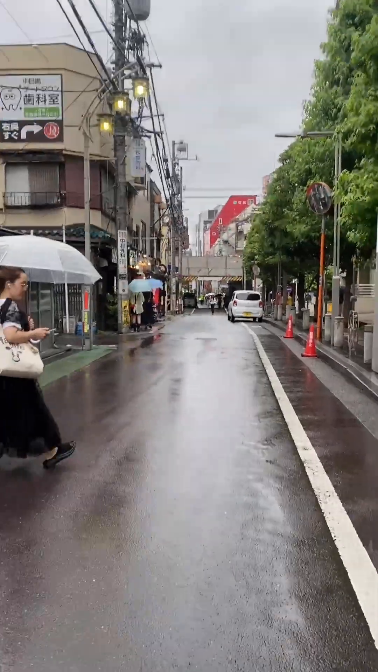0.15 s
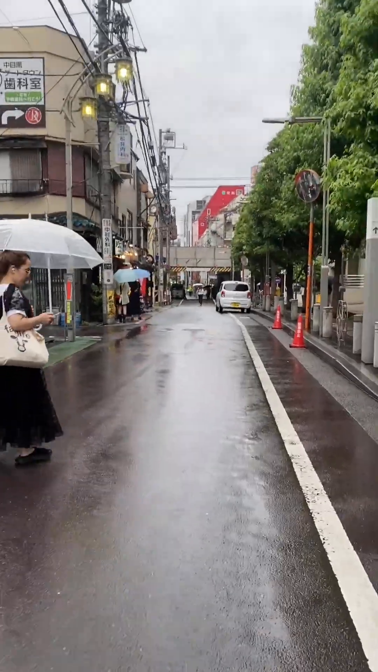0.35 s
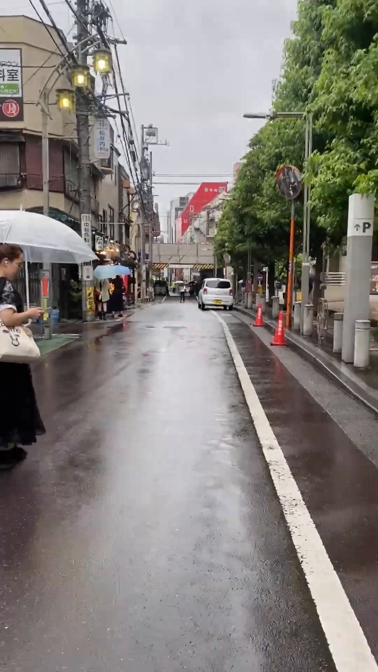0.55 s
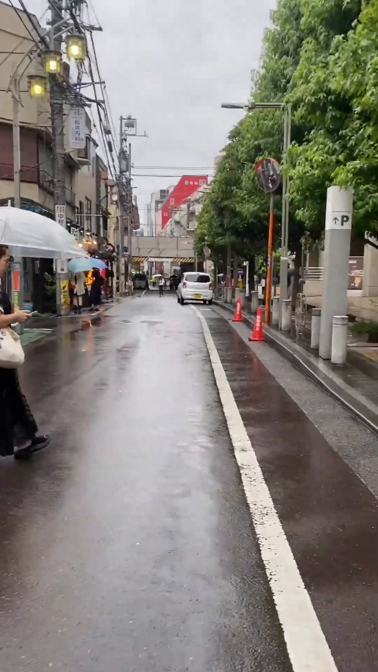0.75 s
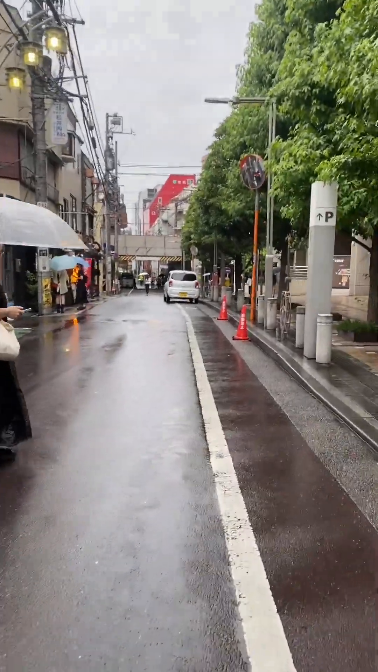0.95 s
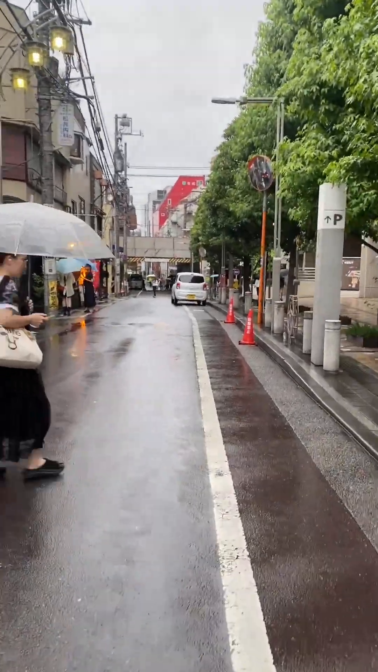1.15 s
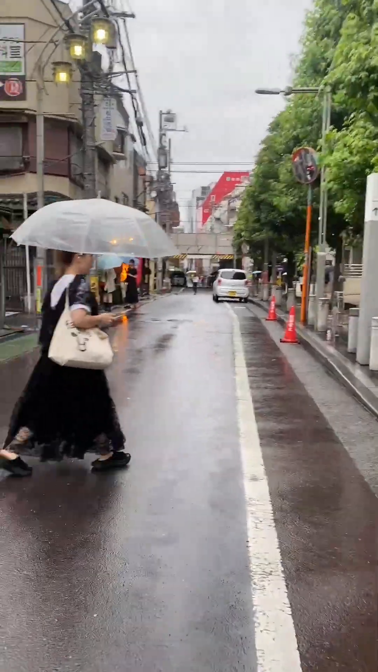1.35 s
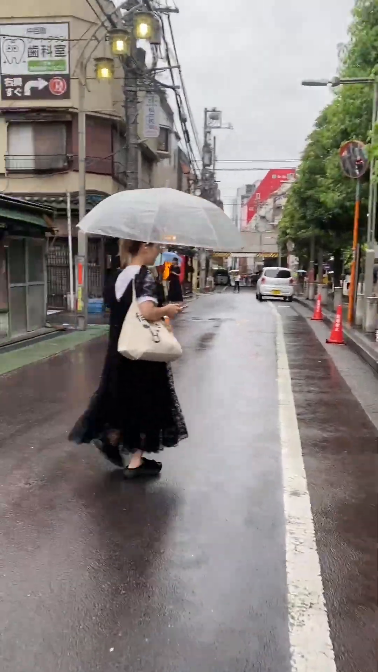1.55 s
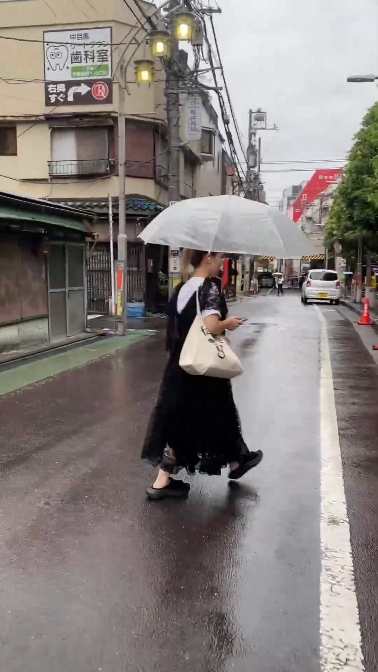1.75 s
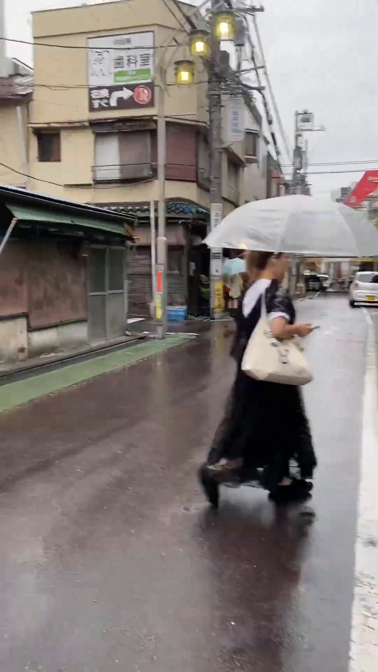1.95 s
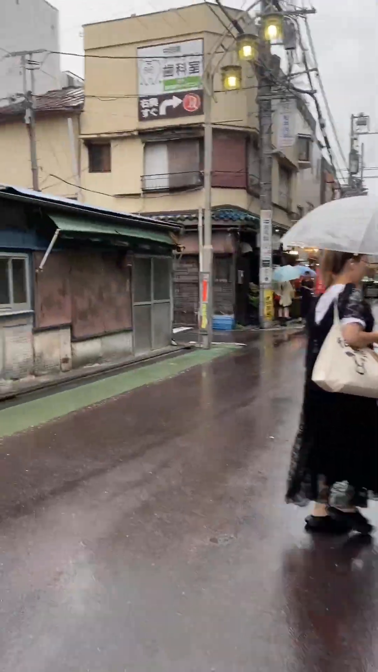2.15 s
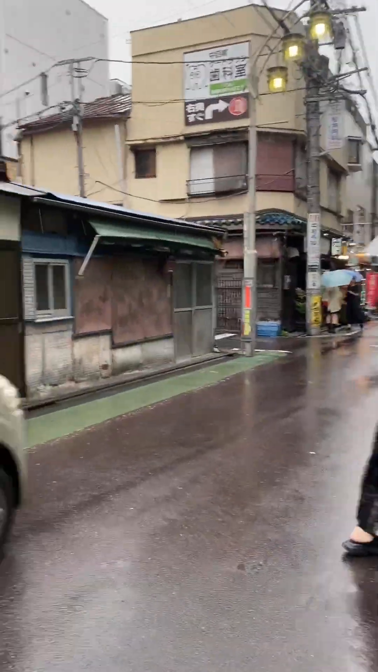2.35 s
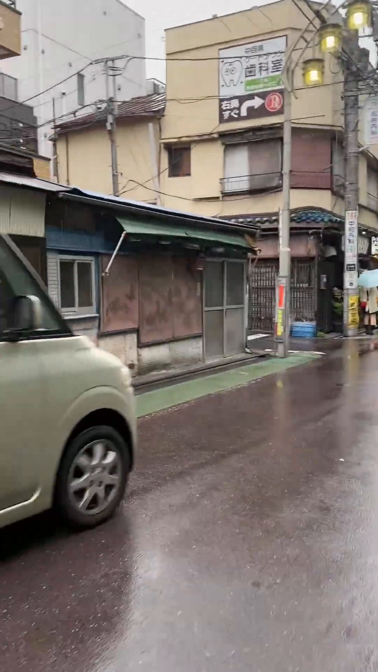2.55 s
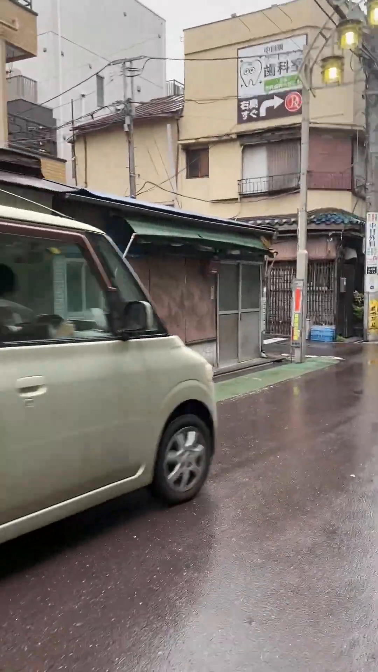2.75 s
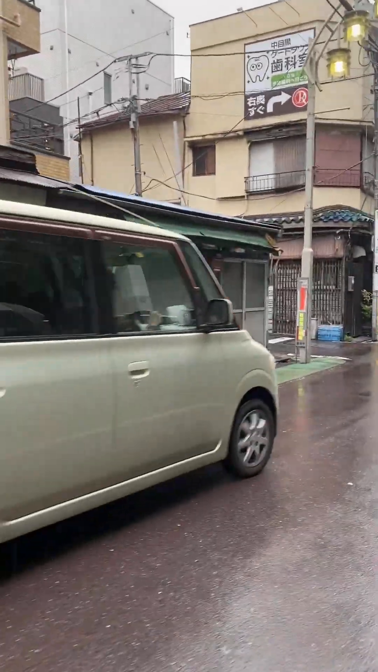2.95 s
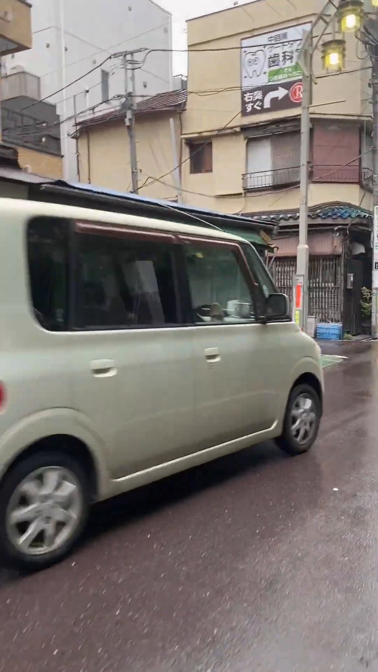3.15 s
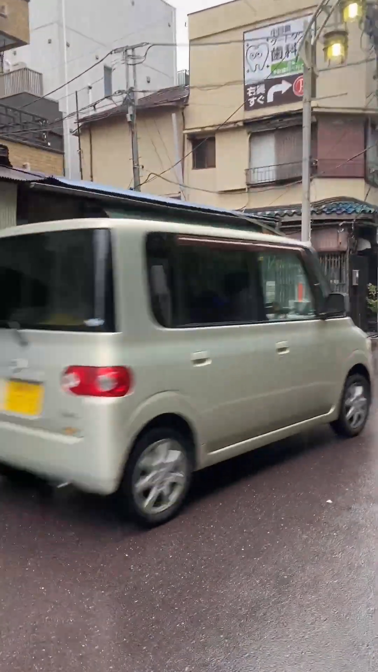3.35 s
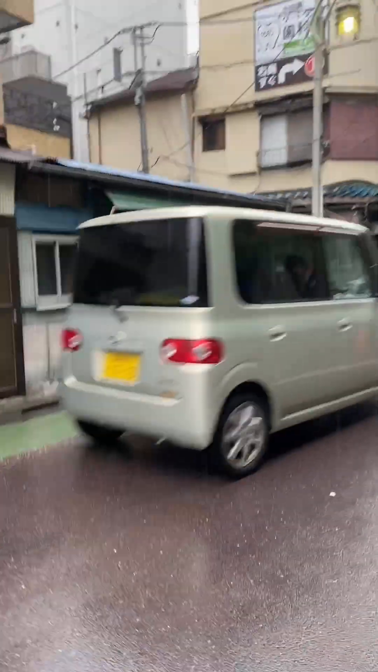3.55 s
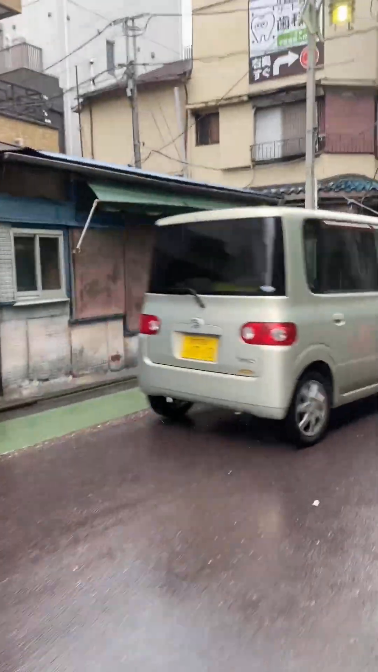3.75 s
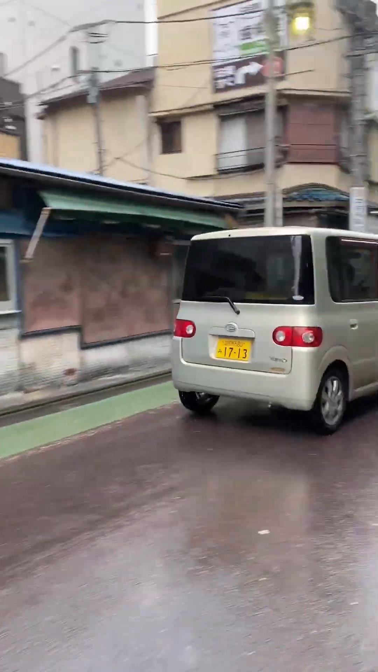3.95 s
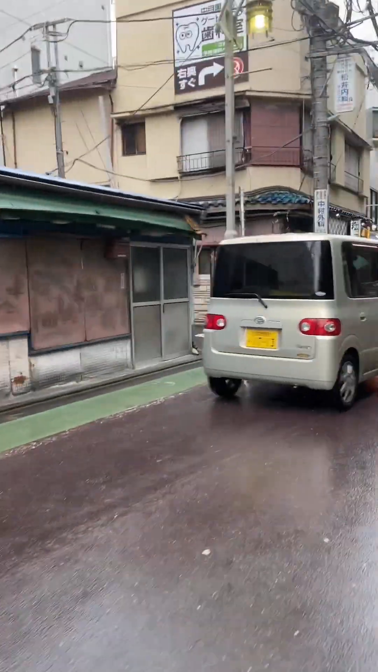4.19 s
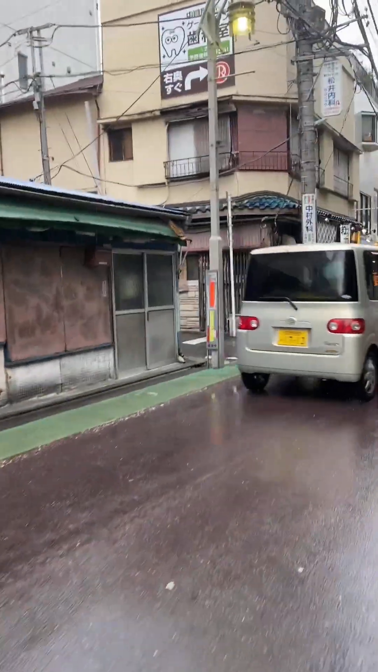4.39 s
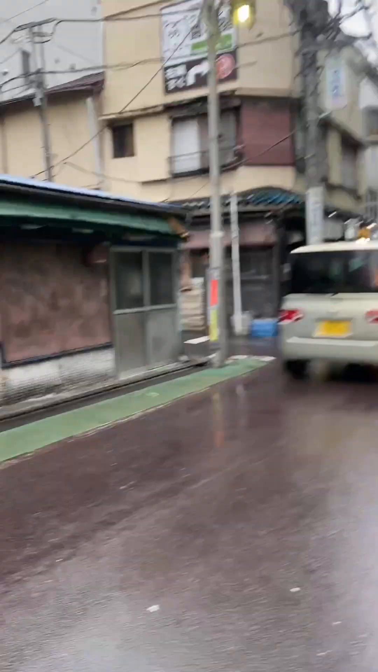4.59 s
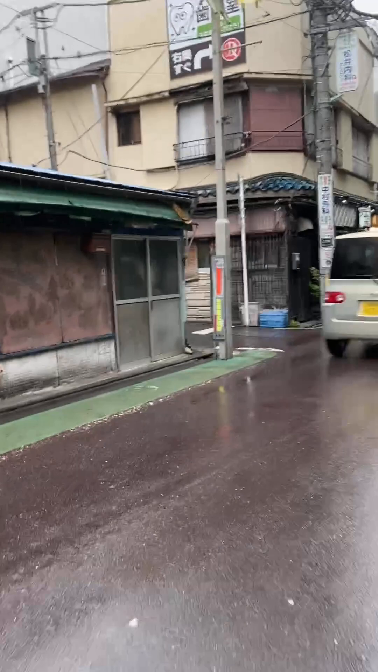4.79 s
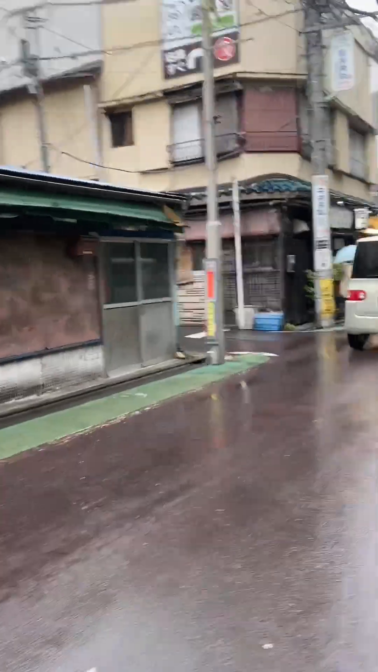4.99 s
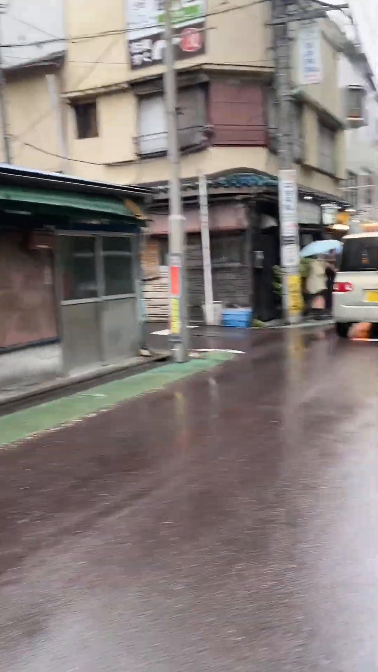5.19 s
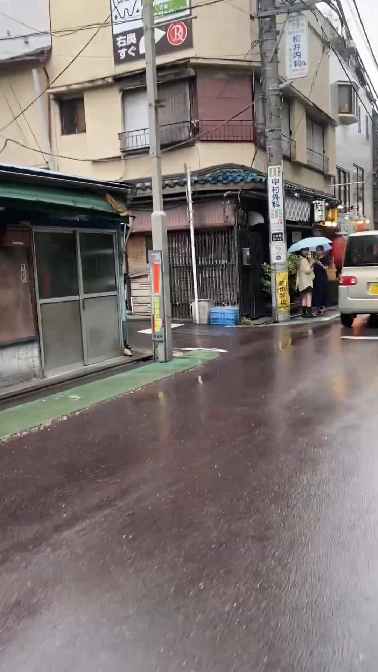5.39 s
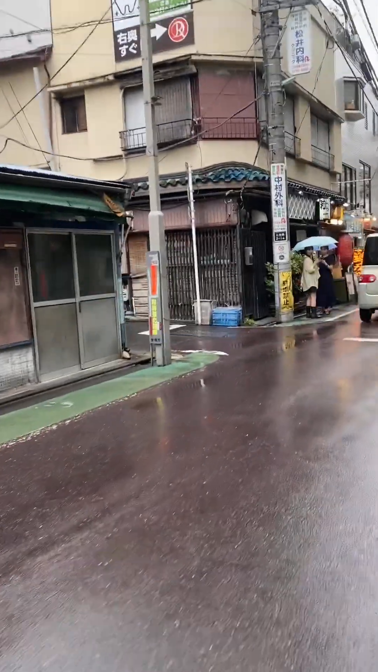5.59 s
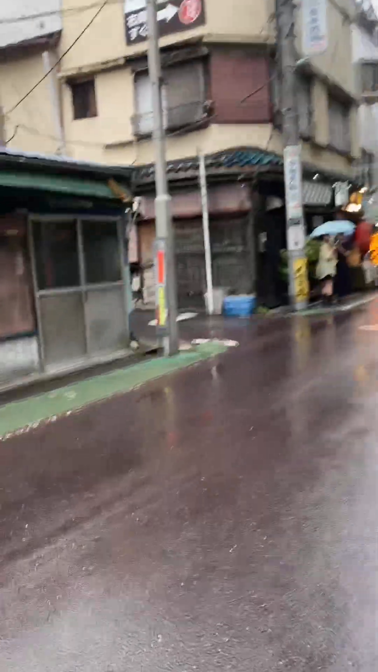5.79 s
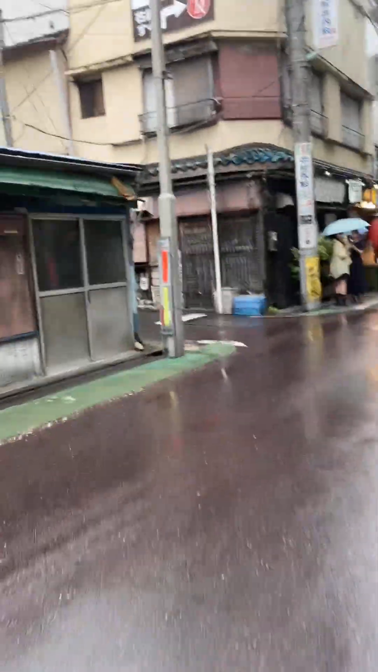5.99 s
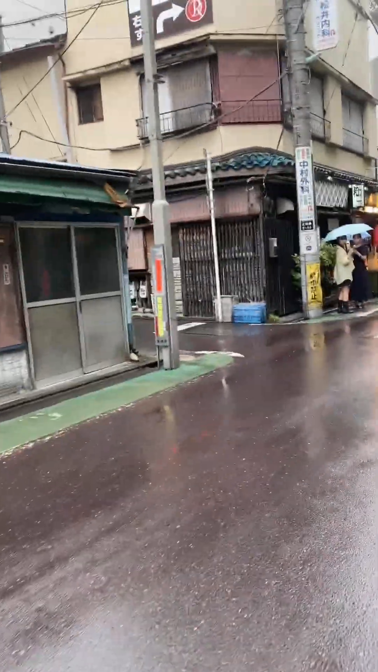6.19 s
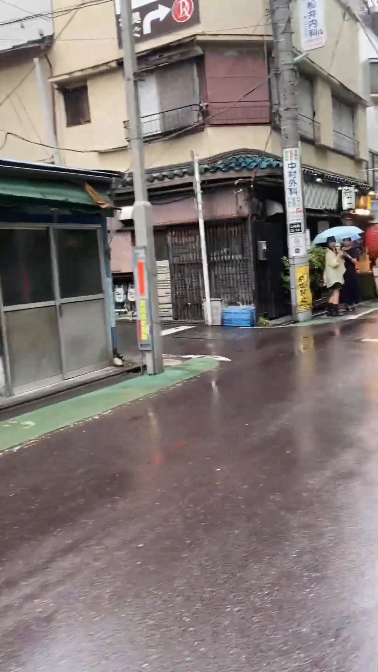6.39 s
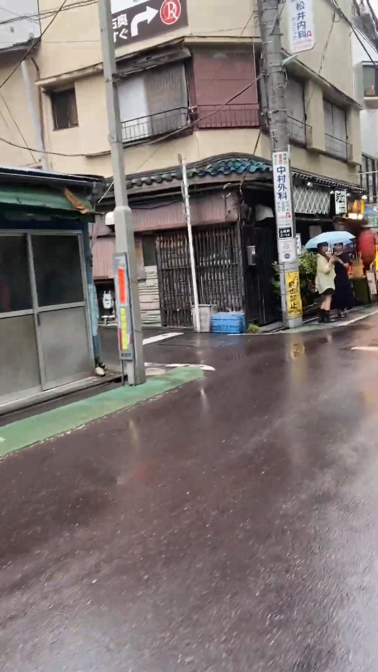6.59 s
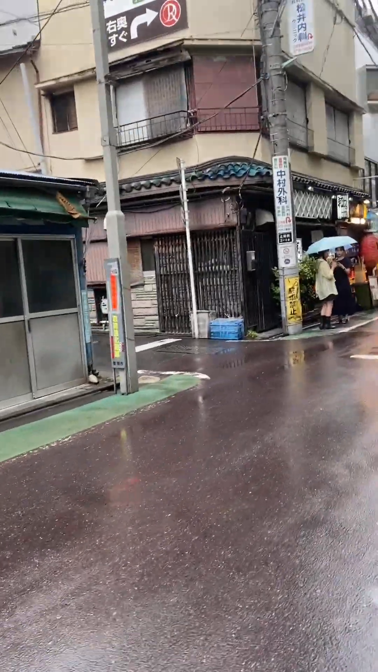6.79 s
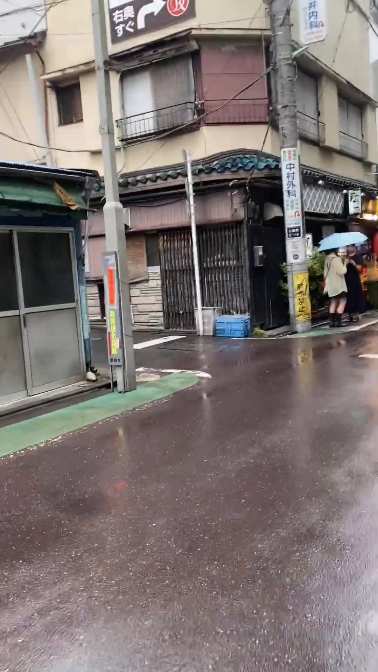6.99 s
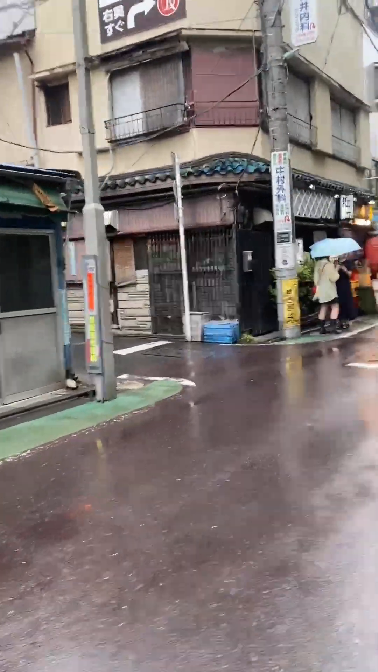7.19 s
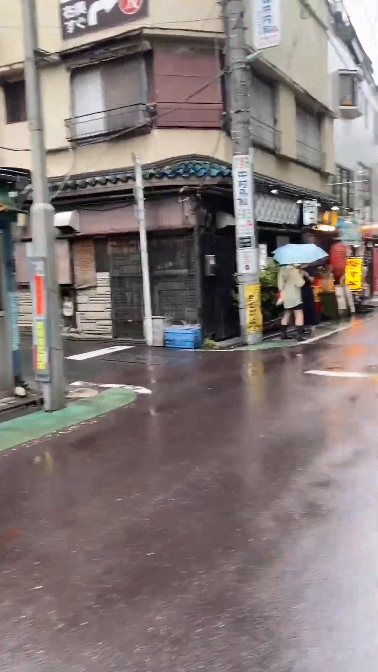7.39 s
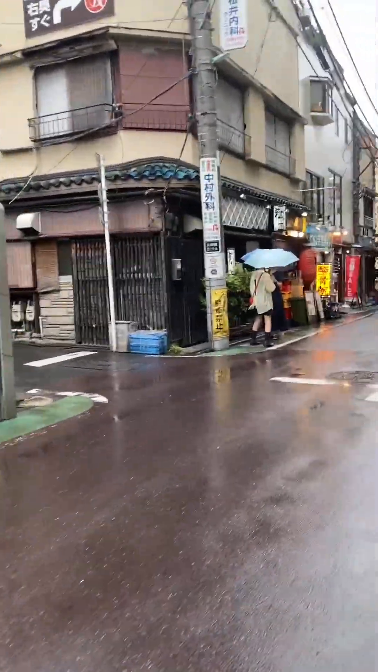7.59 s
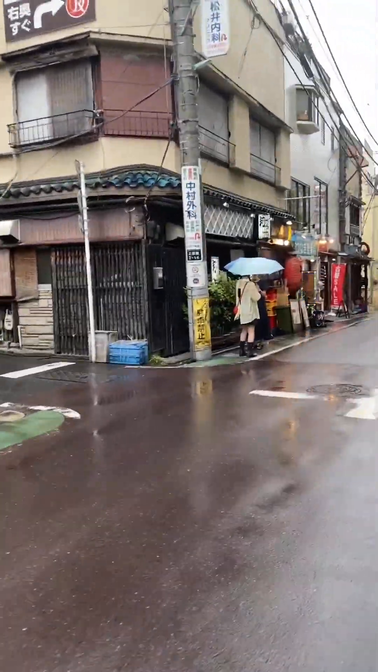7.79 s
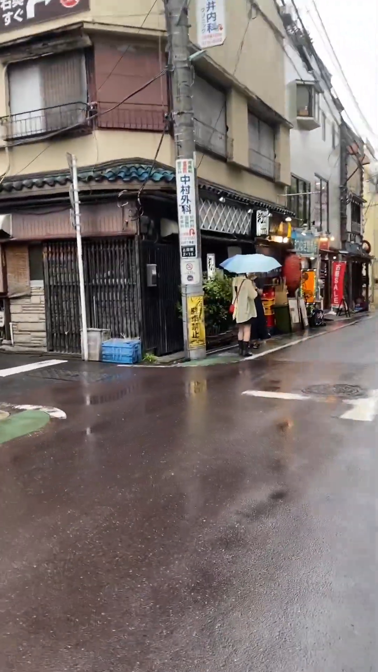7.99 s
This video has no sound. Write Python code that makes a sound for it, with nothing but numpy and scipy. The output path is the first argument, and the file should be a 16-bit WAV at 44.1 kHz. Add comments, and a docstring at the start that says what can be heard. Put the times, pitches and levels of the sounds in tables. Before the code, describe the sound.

A small car picks up from idle and drives past close by on a wet street, engine booming and tyres hissing, then recedes into low rumble.

```python
"""A small car pulls away from idle on a wet street, drives past close by and eases off as it recedes.
Its exhaust booms at the firing rate (sums of sine waves), its tyres hiss and flick water (shaped noise
and random drops); distant traffic, a few wet footsteps and a light knock share the street.
Two closely spaced microphone ports hear it, and their difference widens the picture."""
import sys
import numpy as np
from scipy import signal
from scipy.fft import rfft, irfft, next_fast_len
from scipy.io import wavfile
from scipy.ndimage import map_coordinates

SR = 44100
rng = np.random.default_rng(int(sys.argv[2]) if len(sys.argv) > 2 else 0)


def wrap_up_sound(samples):
    """Save the sound to the file named by the first command line argument, as 16-bit audio."""
    columns = np.atleast_2d(samples).T
    # keep every value between -1 and 1, then stretch to whole-number steps
    tamed = np.clip(columns, -1, 1)
    steps = np.round(tamed * 32767).astype(np.int16)
    wavfile.write(sys.argv[1], SR, steps)


N = 354563
TIME = np.arange(N) / SR  # seconds
SIZE = next_fast_len(N + SR // 4)  # transform length, with room for late echoes
BIN_HZ = np.maximum(np.arange(SIZE // 2 + 1) * SR / SIZE, 1)

# port difference against port sum for sound from the front of the car:
# (frequency [Hz], level [dB], phase lag [rad], coherent share [0-1])
PORTS_AHEAD = [(60, -33, 1.7, 1), (150, -14, 1.8, 0.96), (300, -6, 2.0, 0.94), (550, 5, 1.6, 0.89),
               (1000, 10.5, 2.9, 0.67), (1400, 7.5, 2.2, 0.6), (1750, 1.5, 2.2, 0.7),
               (2200, 8.5, 1.4, 0.68), (2800, 2.5, 3.0, 0.34), (4000, -1, 4.9, 0.64),
               (5000, 4.5, 4.7, 0.79), (7030, 9, 4.8, 0.77)]


def from_db(db):
    """Turn decibels into a gain."""
    return np.exp(np.asarray(db) * np.log(10) / 20)


def rms_one(x):
    """Scale to unit power."""
    return x / np.sqrt(np.mean(x ** 2) + 1e-20)


def in_time(rows):
    """Read each column of a time curve at every sample."""
    s, *columns = np.transpose(rows)
    return [np.interp(TIME, s, c) for c in columns]


def over_hz(rows):
    """Read each column of a spectrum at every frequency bin, on a logarithmic pitch scale."""
    hz, *columns = np.transpose(rows)
    return [np.interp(np.log(BIN_HZ), np.log(hz), c) for c in columns]


def drift(rate):
    """Smooth random wander of spread 1, changing about rate times a second."""
    knots = rng.standard_normal(2048)
    coarse_time = TIME[::32]
    wander = map_coordinates(knots, [coarse_time * rate * 2], order=3, mode="wrap")
    return np.interp(TIME, coarse_time, rms_one(wander))


def swell(at_s, half_s, steepness):
    """Gain of something going by: 1 at at_s, one half at half_s before and after."""
    return 1 / (1 + np.abs((TIME - at_s) / half_s) ** steepness)


def nearness(at_s, pass_s):
    """Closest distance over present distance on a straight pass."""
    return 1 / np.sqrt(1 + ((TIME - at_s) / pass_s) ** 2)


def coloured(x, spectrum):
    """Give x a spectrum that falls away steeply beyond its ends; rms 1."""
    low_hz, high_hz = spectrum[0][0], spectrum[-1][0]
    skirts = 1 / (1 + (low_hz / BIN_HZ) ** 6) / (1 + (BIN_HZ / high_hz) ** 6)
    gain = from_db(over_hz(spectrum)[0]) * skirts
    return rms_one(irfft(rfft(x, SIZE) * gain, SIZE)[:N])


def droplets(per_s, spread_db):
    """Snaps of single droplets of uneven size, at random moments; rms 1."""
    sizes = from_db(spread_db * np.minimum(rng.exponential(1, N), 4)) * rng.choice([-1, 1], N)
    lands = rng.random(N) < per_s / SR
    return rms_one(sizes * lands)


def wet_noise(per_s, spread_db, drops_db):
    """Smooth hiss plus droplets; drops_db sets the droplets against the hiss."""
    return from_db(drops_db) * droplets(per_s, spread_db) + rng.standard_normal(N)


def patchy(x, patchy_db, rate):
    """Uneven water on the road: each third of an octave flutters by itself, about rate times a second."""
    hz, s, cells = signal.stft(x, SR, nperseg=512)
    third_octaves = 3 * np.log2(1 + hz / 300)
    place = np.meshgrid(third_octaves, s * rate * 2, indexing="ij")
    flutter = map_coordinates(rng.standard_normal((24, 600)), place, order=1, mode="mirror")
    return signal.istft(cells * from_db(patchy_db * rms_one(flutter)), SR)[1][:N]


def ports(x, direction, scatter_per_s=16):
    """Left and right are x plus and minus the port difference, partly scattered along ever-changing paths."""
    scatter_rad = 2.5  # how far the scattered phase wanders
    side_db, lag, share = over_hz(direction)
    difference = rfft(x, SIZE) * from_db(side_db)
    direct = irfft(difference * share * np.exp(-1j * lag), SIZE)[:N]
    # each narrow band gets its own delay of up to 25 ms
    echo_s = np.interp(BIN_HZ, np.linspace(0, SR / 2, 1500), rng.uniform(0, .025, 1500))
    phase = 2 * np.pi * np.cumsum(echo_s) * SR / SIZE
    paths = np.sqrt(1 - share ** 2) * np.exp(-1j * phase)
    # a half spectrum gives a complex signal, whose phase can then wander
    scattered = 2 * np.fft.ifft(difference * paths, SIZE)[:N]
    scattered = scattered * np.exp(1j * scatter_rad * drift(scatter_per_s))
    side = direct + scattered.real
    return np.array([x + side, x - side])


def straight(x, direction):
    """Short sharp sounds reach the two ports by the direct path alone."""
    side_db, lag, _ = over_hz(direction)
    side = irfft(rfft(x, SIZE) * from_db(side_db) * np.exp(-1j * lag), SIZE)[:N]
    return np.array([x + side, x - side])


def engine():
    """Clean low exhaust harmonics glide through the pipe's resonances; the engine's other voices join them."""
    # engine speed: idle, pulling away, easing off: (time [s], firing rate [Hz])
    firing = [(0,27.1),(1.25,26.7),(1.57,36.3),(1.8,42.8),(1.95,46.4),(2.1,48.6),(2.4,51.2),(2.7,54.0),(3.2,55.1),(4.05,56.5),(4.35,56),(4.5,53.3),(4.65,48.4),(4.88,40.6),(5.1,35.3),(5.8,34.5),(6.6,34),(7.5,34.2),(8.04,35)]
    # strength of the exhaust pulses, following the throttle: (time [s], level [dB])
    effort = [(0,-38.5),(.7,-40),(.92,-33.5),(1.05,-37.5),(1.25,-34),(1.41,-22),(2.6,-20.5),(4.35,-23.5),(4.6,-30.5),(4.69,-39.5),(5.06,-46),(5.15,-31),(5.66,-30.5),(5.9,-34.5),(6.22,-36.5),(6.37,-49.5),(6.48,-38),(7.38,-35.5),(7.58,-50.5),(7.7,-36.5),(8.04,-37.5)]
    # resonances of the exhaust pipe and silencer: (frequency [Hz], level [dB])
    pipe = [(34,-30),(40,-15.5),(47,-1.5),(54,-0.5),(68,1.9),(80,-6),(96,0),(102,-2.5),(105.5,-8.5),(109,-8.5),(114,-4.5),(128,-15),(146,-3),(168,-6)]
    third_cut_db = -11.5  # lowers the third harmonic against the second
    boom_db, boom_at_s, boom_pass_s = 5, 2.94, 0.85  # the fundamental swells as the tailpipe comes close

    firing_hz, effort_db = in_time(firing)[0], in_time(effort)[0]
    turn = 2 * np.pi * np.cumsum(firing_hz * (1 + 0.0021 * drift(10.0))) / SR
    pipe_db = np.interp(np.outer([1, 2, 3], firing_hz), *np.transpose(pipe))
    first_db, second_db, third_db = effort_db + pipe_db

    first_gain = from_db(first_db + boom_db + 0.21 * drift(5.1)) * nearness(boom_at_s, boom_pass_s)
    boom = first_gain * np.cos(turn)
    boom += from_db(second_db + .4 * drift(6)) * np.cos(2 * turn - np.pi / 4)
    boom += from_db(third_db + third_cut_db + 1.2 * drift(6)) * np.sin(3 * turn)

    tones = np.sqrt(2) * (boom + whine() + hum() + drone(firing_hz, turn))  # root 2: levels become rms
    noises = mutter(turn) + intake(turn) + burble() + far_roar()
    return ports(tones + noises, PORTS_AHEAD, scatter_per_s=1.5)


def whine():
    """A faint rough whine: one wobbling tone grows, climbs as the car gathers speed and dies away."""
    # path of the whine: (time [s], pitch [Hz], level [dB])
    whine_path = [(0,515,-69),(.8,525,-60),(1.15,545,-55.5),(1.45,529.5,-57),(1.65,589,-71),(1.88,617,-53),(2.1,618,-70.5),(2.5,623,-100)]
    roughness = .05  # spread of the pitch, as a fraction
    hz, db = in_time(whine_path)
    turn = 2 * np.pi * np.cumsum(hz * (1 + roughness * drift(45))) / SR
    return np.cos(turn) * from_db(db + 3 * drift(14))


def hum():
    """Two engine-bay tones an octave apart rise a little and settle; close by, the low one beats with the exhaust."""
    settled_hz, rise_hz, rise_end_s = 205.3, 10, 3.2  # the rise takes one second
    high_db, far_db, high_at_s, high_half_s = -41, -57, 3.6, 1.2  # swells as the car goes by
    low_db, low_at_s, low_half_s = -33.5, 2.8, 0.74  # the lower octave carries only a short way

    hz = settled_hz - rise_hz * np.clip(rise_end_s - TIME, 0, 1)
    turn = 2 * np.pi * np.cumsum(hz) / SR
    gain = from_db(high_db) * swell(high_at_s, high_half_s, steepness=15) + from_db(far_db)
    high = np.cos(turn + .6 * drift(5)) * gain * from_db(2 * drift(5))
    low = np.cos(turn / 2) * from_db(low_db) * swell(low_at_s, low_half_s, steepness=1.5)
    return high + low


def mutter(turn):
    """Uneven idle firings puff in the low middle range, as pulsing noise, until the engine picks up."""
    # colour of the idle mutter: (frequency [Hz], level [dB per Hz])
    mutter_colour = [(105,-2.5),(135,0.5),(165,0),(195,-9.5)]
    level_db, at_s, half_s = -47, 1, 0.78
    puffs = rms_one(np.exp(0.7 * np.cos(turn)))
    gain = from_db(level_db) * swell(at_s, half_s, steepness=4.7)
    return coloured(rng.standard_normal(N), mutter_colour) * puffs * gain


def street():
    """Distant traffic on wet asphalt is fluttering wet noise, with the footsteps and the knock in it."""
    # colour of the distant traffic: (frequency [Hz], level [dB per Hz])
    traffic_colour = [(36,-15),(55,-3.5),(78,-2),(105,-6.5),(150,-11.5),(205,-11.5),(280,-16.5),(430,-23.5),(640,-33),(850,-39),(1100,-37.5),(1380,-39.5),(1850,-37.5),(2300,-43.5),(2900,-45),(4000,-52),(4900,-61),(6000,-59.5),(8000,-73)]
    # strength of the distant traffic: (time [s], level [dB])
    traffic_level = [(0,-38),(1.1,-37),(5.5,-37.5),(6.15,-38),(6.8,-37),(7.45,-37),(8.04,-37.5)]
    # port difference against port sum for sound from the street:
    # (frequency [Hz], level [dB], phase lag [rad], coherent share [0-1])
    street_ports = [(60, -33, 1.9, 0.65), (150, -12.5, 2.0, 0.69), (300, -6.5, 2.1, 0.76),
                    (550, 5.5, 1.4, 0.77), (1000, 14, 2.8, 0.5), (1500, 6, 4.4, 0.54),
                    (2100, 4.5, 3.0, 0.43), (2800, 5, 4.9, 0.71), (3800, 3.5, 4.5, 0.57),
                    (5000, 7.5, 4.6, 0.66), (7000, 4.5, 4.7, 0.78)]
    wet_road = coloured(wet_noise(per_s=200, spread_db=3.0, drops_db=-12.5), traffic_colour)
    traffic = from_db(in_time(traffic_level)[0]) * patchy(wet_road, patchy_db=2.24, rate=10)
    return ports(traffic, street_ports) + straight(footsteps() + tick(), street_ports)


def footsteps():
    """A wet sole slaps the road: a quick burst of droplets in its resonances, then a faint scattered tail."""
    # wet footsteps: (time [s], level [dB], decay [s], brightness [dB per octave])
    steps = [(1.388,-48,.005,2),(1.399,-57,.007,-6),(1.909,-55.5,.0015,16),(5.331,-58.5,.014,2),(5.754,-63.5,.005,5),(5.893,-67,.012,-2),(6.519,-67,.012,-2),(6.53,-65,.011,-2),(7.108,-62.5,.011,-1)]
    # what a wet sole rings with: (frequency [Hz], level [dB per Hz])
    sole = [(2200,-11),(3200,-7),(3800,5.5),(4300,-1),(4900,-11),(5500,-4),(6250,-15.5),(6950,-6.5),(7600,-19.5),(9000,-25.5)]
    attack_s = 0.0015
    tail_db, tail_s = -17.5, 0.052  # the house fronts scatter a short tail back

    out = np.zeros(N)
    water = wet_noise(per_s=2000, spread_db=2.5, drops_db=-3)
    for s, db, decay_s, brightness in steps:
        age = np.clip(TIME - s, 0, 1)
        fall = np.exp(-age / decay_s) + from_db(tail_db) * np.exp(-age / tail_s)
        tilted_sole = [(hz, level + brightness * np.log2(hz / sole[0][0])) for hz, level in sole]
        slap = coloured(water, tilted_sole)
        out += from_db(db) * slap * np.minimum(age / attack_s, 1) * fall
    return out


def drone(firing_hz, turn):
    """Rough upper harmonics and half orders waver in and out while the car is close, beamed in lobes that sweep by."""
    # lobes of the drone: (multiple of the firing rate [-], level [dB], loudest at [s], half length [s])
    lobes = [(1.5,-49.5,2.4,0.96),(3,-39,3.55,.62),(4,-39,2.5,.45),(4,-38.5,3.55,.38),(4.5,-48.5,5.8,0.58),(5,-45,2.55,0.55),(5,-44,3.35,0.25),(6,-40.5,2.45,0.19),(6,-42,3.3,.38),(7,-52,2.9,0.82),(8,-56.5,2.3,0.15),(8,-51,4.0,0.19)]
    panel_hz, panel_width_hz, panel_db = 290, 7.2, 3.5  # a body panel rings when a harmonic sweeps through it
    waver_db, waver_rad = 1.1, .1

    out = np.zeros(N)
    for multiple, db, loudest_s, half_s in lobes:
        ring_db = panel_db / (1 + ((multiple * firing_hz - panel_hz) / panel_width_hz) ** 2)
        lobe = swell(loudest_s, half_s, steepness=6)
        tone = np.cos(multiple * (turn + np.pi / 2) + waver_rad * drift(8))
        out += from_db(db + ring_db + waver_db * drift(8)) * lobe * tone
    return out


def intake(turn):
    """Air rushes into the engine in one gulp of noise per firing; loudest as the bonnet goes by."""
    # breathy roar from under the bonnet: (frequency [Hz], level [dB per Hz])
    breath_colour = [(150,-0.5),(310,1),(380,-7.5),(470,-9.5),(650,-18.5)]
    level_db, at_s, half_s = -40.5, 2.43, 0.77
    throb = 2.2  # how sharply the gulps stand out
    gain = from_db(level_db) * swell(at_s, half_s, steepness=4.4)
    gulps = rms_one(np.exp(-throb * np.cos(turn)))
    return coloured(rng.standard_normal(N), breath_colour) * gulps * gain


def tyres():
    """One swell drives rumble, roar and spray; their colour and direction turn from front to rear as the car goes by."""
    # colours of carcass rumble, front tread and spray, rear tread and spray, and the distant
    # tread roar that the street carries: each (frequency [Hz], level [dB per Hz])
    rumble_colour = [(70,-0.5),(130,-9),(220,2),(330,0.5),(430,-6),(600,-17),(900,-27)]
    front_tread, front_spray = [(450,-2.5),(650,-3.5),(900,1.5),(1150,2.5),(1400,-4.5),(1750,3),(2100,0.5),(2500,-4.5),(3100,-3),(4200,-18)], [(2500,-18),(3400,3.5),(4200,1.5),(4900,-9),(5800,-10),(7000,-16.5),(8000,-26.5),(9500,-36.5),(12000,-51.5)]
    rear_tread, rear_spray = [(380,-3),(500,-1),(620,-4.5),(740,-3),(860,1.5),(980,-3.5),(1150,-0.5),(1380,-8.5),(1650,2.5),(1950,2),(2350,-10),(2800,1.5),(3300,-7.5),(4200,-26.5)], [(2500,-18),(3500,6),(4100,-0.5),(4800,-9.5),(5700,-8),(7000,-14),(8000,-25),(9500,-44),(12000,-55.5)]
    far_colour = [(550,-7),(800,0.5),(1100,4),(1400,-2.5),(1800,-3.5),(2400,-9),(2900,-4.5),(3900,-10)]
    # port difference against port sum for sound from the rear of the car:
    # (frequency [Hz], level [dB], phase lag [rad], coherent share [0-1])
    rear_ports = [(59, -44, 1.6, 0.89), (150.3, -11, 1.9, 0.76), (300, -3.5, 1.9, 0.68),
                  (550, 3.5, 1.4, 0.87), (1000, 10.5, 2.6, 0.67), (1400, 11.5, 3.4, 0.61),
                  (1800, -4.5, 3.0, 0.72), (2250, 10.5, 2.5, 0.53), (2800, 1, 4.34, 0.77),
                  (3800, 0, 4, 0.35), (5000, 2.5, 4.6, 0.68), (7000, 8, 4.8, 0.8)]
    loudest_s, half_s = 3.54, 1.5
    approach_steepness, recede_steepness = 5.36, 2.84
    turn_start_s, turn_s = 3.08, .62  # the car turns its rear to the listener
    rumble_peak_db, tread_peak_db, spray_peak_db = -42, -46, -56
    # swing in dB against that of the tread roar; the rumble changes as the swell peaks
    rumble_before, rumble_after, spray_ahead, spray_behind = 0.65, 0.77, 0.73, 1.17
    ahead_db, ahead_at_s, ahead_half_s = -63.5, 2, .55  # the street carries the roar ahead of the car
    behind_db = -62.5  # and still carries it back from the distant car

    behind = np.clip((TIME - turn_start_s) / turn_s, 0, 1)
    coming = TIME < loudest_s
    close = swell(loudest_s, half_s, np.where(coming, approach_steepness, recede_steepness))
    pass_db = 20 * np.log10(close)
    tread_db = tread_peak_db + pass_db
    rumble_db = rumble_peak_db + np.where(coming, rumble_before, rumble_after) * pass_db
    rumble = coloured(rng.standard_normal(N), rumble_colour) * from_db(rumble_db)

    front = tyre_side(front_tread, front_spray, tread_db, spray_peak_db + spray_ahead * pass_db)
    rear = tyre_side(rear_tread, rear_spray, tread_db, spray_peak_db + spray_behind * pass_db)
    front = front * np.sqrt(1 - behind)  # equal-power fade from front to rear
    rear = rear * np.sqrt(behind)

    ahead = from_db(ahead_db) * swell(ahead_at_s, ahead_half_s, steepness=2.8)
    far = coloured(rng.standard_normal(N), far_colour) * (ahead + from_db(behind_db) * behind)
    rolling = ports(rumble + front, PORTS_AHEAD) + ports(rear + far, rear_ports)
    return rolling + straight(splashes() + spatter(), rear_ports)


def tyre_side(tread, spray, tread_db, spray_db):
    """Tread blocks slap the water film and fling a fine spray: two coloured layers of hiss and droplets."""
    roar = coloured(wet_noise(per_s=640, spread_db=4.0, drops_db=-3.5), tread) * from_db(tread_db)
    hiss = coloured(wet_noise(per_s=1200, spread_db=4.5, drops_db=-3.0), spray) * from_db(spray_db)
    return patchy(swish(roar + hiss), patchy_db=1.5, rate=22)


def swish(x):
    """Echo paths stretch as the car comes abreast, sweeping shallow notches through its hiss."""
    # echoes from the road and house fronts: (delay when far [s], delay when abreast [s], gain [-])
    echo_paths = [(.0009,0.0013,0.06),(.0027,.0052,0.19),(.0046,.0105,0.18),(.008,.017,.16)]
    near = nearness(at_s=2.9, pass_s=1.3)
    echoes = np.zeros(N)
    for far_s, near_s, gain in echo_paths:
        delay_s = far_s + (near_s - far_s) * near
        echoes += gain * map_coordinates(x, [(TIME - delay_s) * SR], order=1)
    return x + echoes  # direct sound and echoes interfere


def splashes():
    """Water squeezed from under a tyre bursts into a short cluster of droplets: brief band-passed wet noise."""
    # water thrown up by the wheels: (time of peak [s], level [dB], pitch [Hz], length [s])
    bursts = [(1.705,-59,3380,.04),(2.02,-61.5,3990,.24),(3.125,-39.5,2040,0.005),(3.152,-41,2500,0.018),(3.15,-50,1340,0.021),(3.235,-47.5,2080,0.06),(3.38,-45,1940,0.022),(3.50,-45,1650,0.034)]
    width = 1.13  # band edges against the pitch
    out = np.zeros(N)
    water = wet_noise(per_s=2000, spread_db=2.5, drops_db=-3)
    for s, db, hz, length in bursts:
        age = np.maximum(TIME - s + length / 2, 0) / (length / 2)  # 1 at the peak
        band = signal.butter(2, [hz / width, hz * width], "band", fs=SR, output="sos")
        splash = rms_one(signal.sosfilt(band, water))
        envelope = age ** 2 * np.exp(2 - 2 * np.minimum(age, 20))
        out += from_db(db) * splash * envelope
    return out


def spatter():
    """Larger drops flung from the tyres land on road and wheel arches, each a brief ring at one of 12 pitches."""
    # colour of the landing drops: (frequency [Hz], level [dB per Hz])
    drop_colour = [(1400,-2.5),(2300,2),(3600,-2.5),(5400,-13),(7000,-19)]
    level_db, at_s, half_s = -59, 3.6, 1.19
    ring_q = 5.3  # a higher Q lets each drop ring longer
    drops = droplets(per_s=240, spread_db=2.5)
    dealt = rng.integers(0, 12, N)  # which pitch each drop gets
    out = np.zeros(N)
    for k, hz in enumerate(np.geomspace(drop_colour[0][0], drop_colour[-1][0], 12)):
        ring = signal.iirpeak(hz, ring_q, fs=SR)
        out += signal.lfilter(*ring, drops * (dealt == k) + 1e-18)  # tiny offset keeps the filter fast
    return coloured(out, drop_colour) * from_db(level_db) * swell(at_s, half_s, steepness=5)


def burble():
    """With the throttle shut, weak firings fill the lull after the driver lifts off: a swell of low noise."""
    # colour of the exhaust burble: (frequency [Hz], level [dB per Hz])
    burble_colour = [(40,-2),(50,-1),(62,-5)]
    level_db, at_s, half_s = -42.5, 4.88, 0.11
    gain = from_db(level_db) * swell(at_s, half_s, steepness=4)
    return coloured(rng.standard_normal(N), burble_colour) * gain


def tick():
    """A light knock down the street and two bounces ring the same short modes, as fading sine waves."""
    # ringing modes of the hard tick: (frequency [Hz], level [dB], time to fall 60 dB [s])
    tick_modes = [(1520,-7,0.018),(1814,-1,0.019),(2150,-9.5,0.013),(2500,-8,0.016)]
    # the knock and its bounces: (time [s], level [dB])
    knocks = [(5.272,-31),(5.288,-38),(5.312,-40.5)]
    attack_s = .001
    out = np.zeros(N)
    for s, strength_db in knocks:
        age = np.clip(TIME - s, 0, 1)
        ringing = np.zeros(N)
        for hz, db, t60 in tick_modes:
            ringing += from_db(db - 60 * age / t60) * np.sin(2 * np.pi * hz * age)
        out += from_db(strength_db) * ringing * np.minimum(age / attack_s, 1)
    return out


def far_roar():
    """The engine's roar comes back off the house fronts, blurred into low noise, as the throttle opens again."""
    # colour of the blurred roar: (frequency [Hz], level [dB per Hz])
    roar_colour = [(160,-4.5),(215,3.5),(265,-3.5),(320,-16),(480,-15.5)]
    level_db, at_s, half_s = -45.5, 5.706, 0.67
    gain = from_db(level_db) * swell(at_s, half_s, steepness=3.7)
    return coloured(rng.standard_normal(N), roar_colour) * gain


def scene():
    """The car in its street."""
    return engine() + street() + tyres()


def record(dry):
    """A steep low-pass filter cuts the top."""
    cutoff_hz = 8600
    return signal.sosfilt(signal.butter(16, cutoff_hz, fs=SR, output="sos"), dry)


dry = scene()
out = record(dry)
wrap_up_sound(out)
```